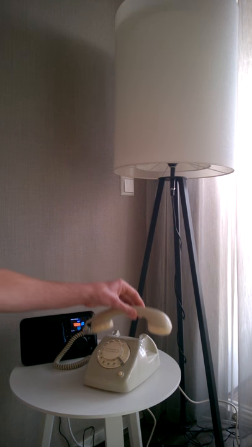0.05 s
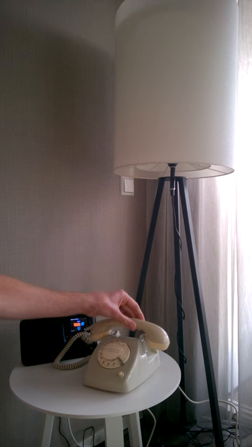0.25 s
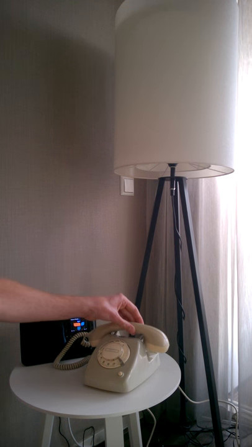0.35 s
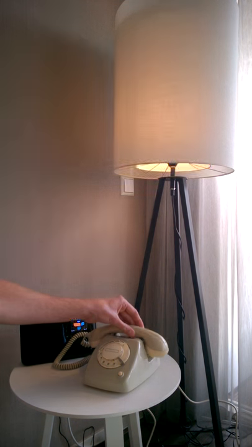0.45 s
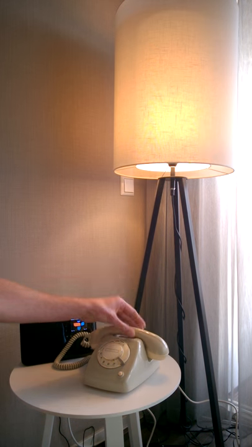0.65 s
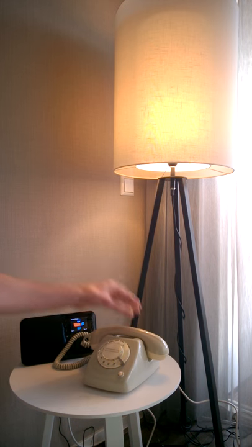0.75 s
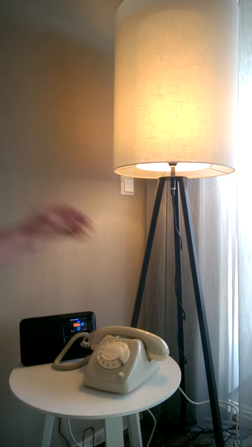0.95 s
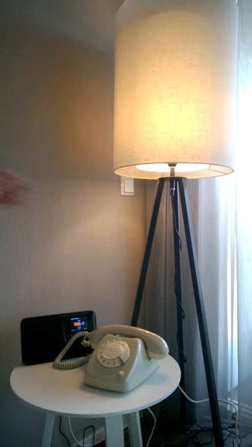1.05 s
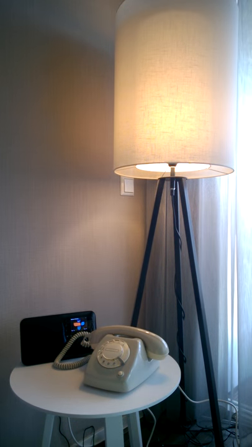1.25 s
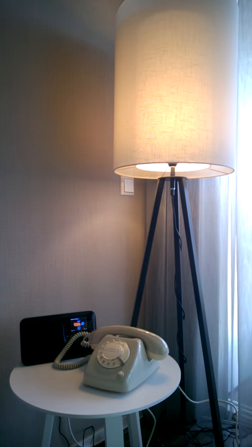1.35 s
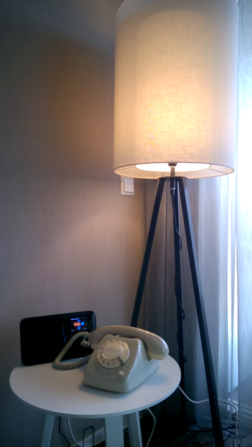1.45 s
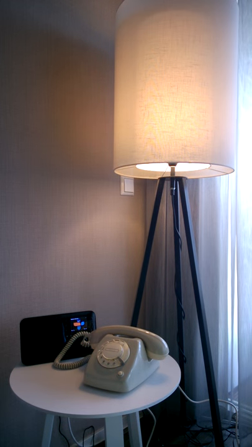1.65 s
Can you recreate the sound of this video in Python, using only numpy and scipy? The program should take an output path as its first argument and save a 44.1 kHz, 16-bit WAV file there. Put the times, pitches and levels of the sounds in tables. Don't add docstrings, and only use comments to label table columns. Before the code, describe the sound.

Old desk phone handset being hung up: hollow knock, sharp metallic hook clack, small rattles, then quiet.

```python
import sys
import numpy as np
from scipy import signal
from scipy.fft import rfft, irfft, next_fast_len
from scipy.io import wavfile
from scipy.ndimage import map_coordinates

SR = 44100
rng = np.random.default_rng(int(sys.argv[2]) if len(sys.argv) > 2 else 0)


def store_pcm(level_fs):
    pcm = np.round(np.clip(level_fs, -1, 1) * 32767).astype(np.int16)
    wavfile.write(sys.argv[1], SR, np.atleast_2d(pcm).T)


def ratio_of_db(decibels):
    return 10 ** (np.asarray(decibels, float) / 20)


N = 74970


def unit(x):
    return x / np.sqrt(np.mean(x ** 2) + 1e-20)


def along(points, hz):
    f, value = np.transpose(points)
    return np.interp(np.log(hz + 1), np.log(f + 1), value)


def wobble(rate):
    knots = rng.standard_normal(int(N * rate / SR) + 4)
    return map_coordinates(knots, [np.arange(N) * rate / SR])


def noise(spectrum, size):
    m = next_fast_len(size + 8192)
    gain = ratio_of_db(along(spectrum, np.fft.rfftfreq(m, 1 / SR)))
    return unit(irfft(rfft(rng.standard_normal(m)) * gain, m)[:size])


def seconds(length_s):
    return np.arange(int(length_s * SR)) / SR


def at(s, sound):
    return np.pad(sound, (round(s * SR), N))[:N]


def decay(t, t60):
    return ratio_of_db(-60 * t / t60)


def rise(t, rise_s):
    return (1 - np.exp(-t / rise_s)) ** 2


FLUTTER_DB, FLUTTER_RATE = 5.5, 54.6


def ring(modes, t, scatter_db, rise_s, free=1, in_step=False):
    hz, db, t60 = np.transpose(modes)[:, :, None]
    luck = rng.standard_normal((len(modes), 2))
    knots = rng.standard_normal((len(modes), 64))
    waver = np.array([np.interp(t * FLUTTER_RATE, np.arange(len(k)), k) for k in knots])
    if in_step:
        waver = 0.76 * waver
        sign = 1
    else:
        sign = np.sign(luck[:, 1:])
    gains = sign * ratio_of_db(db + scatter_db * luck[:, :1] + FLUTTER_DB * waver)
    partials = gains * decay(t, free * t60) * np.sin(2 * np.pi * hz * t)
    return partials.sum(axis=0) * rise(t, rise_s)


# (f/Hz, density/dB)
RUMBLE = [(15, -32), (30, -9), (41, -3.5), (49, 0.5), (55, -2.5), (62, -19), (75, -30), (120, -94)]
# (f/Hz, density/dB)
DRONE = [(60, -24), (78, -11), (100, -0.5), (135, -5.5), (180, -4), (240, -5), (290, -17.5), (380, -40)]
# (f/Hz, density/dB)
HISS = [(200, -39), (300, -6), (1000, -6.5), (2200, -12.5), (4500, -13), (7000, -17.5), (10000, -25),
        (15800, -26)]


def quiet_room():
    t = np.arange(N) / SR
    hum = ratio_of_db(-73.5 + 6 * wobble(7.7)) * np.sin(2 * np.pi * 49.5 * t + 0.4 * wobble(5))
    rumble = ratio_of_db(-57) * noise(RUMBLE, size=N)
    drone = ratio_of_db(-65 + 1.2 * wobble(6.13)) * noise(DRONE, size=N)
    hiss = ratio_of_db(-68 + 0.1 * wobble(9)) * noise(HISS, size=N)
    return hum + rumble + drone + hiss


# (f/Hz, t60/s)
ROOM = [(300, 0.49), (1000, 0.53), (4000, 0.44), (12000, 0.18)]
ROOM_DB, ROOM_DELAY_S = -7.5, 0.006


def room(x):
    hz, t, z = signal.stft(rng.standard_normal(SR // 2), SR, nperseg=256)
    fading = z * decay(t, along(ROOM, hz)[:, None])
    tail = signal.istft(fading, SR, nperseg=256)[1]
    tail = np.pad(tail / np.linalg.norm(tail), (int(ROOM_DELAY_S * SR), 0))
    return signal.fftconvolve(x, tail)


# (t/s, level/dB)
GRIP = [
    (.002, -55),
    (.1, -54),
]
# (f/Hz, level/dB, t60/s)
HELD = [(835, 2, .06), (885, -11, .07), (1029, -1.5, 0.058), (1195, -3.5, 0.044), (1657, -3, 0.037),
        (2270, -7, 0.013), (3720, -5.5, 0.024), (4970, -8, .01)]


def grip():
    t = seconds(0.5)
    dry = sum(at(s, ratio_of_db(db) * ring(HELD, t, 1.8, 0.00013)) for s, db in GRIP)
    return dry + ratio_of_db(ROOM_DB + 3.5) * room(dry)[:N]


# (t/s, level/dB)
JOLTS = [
    (.232, -43),
    (0.526, -49.5),
    (0.629, -54),
]
# (f/Hz, level/dB, t60/s)
TABLE = [(90.6, 1.5, 0.27), (63.7, -14, .12)]


def table():
    t = seconds(0.5)
    return sum(at(s, ratio_of_db(db) * ring(TABLE, t, 1, 0.0062)) for s, db in JOLTS)


# (f/Hz, density/dB)
FIZZ = [(2500, -15), (4500, -3.5), (6000, 2.5), (8000, -5.5), (10500, -14), (12500, -22.5), (15800, -36)]


def chatter(curve):
    s, db = np.transpose(curve)
    level_db = np.interp(np.arange(N) / SR, s, db, left=-150, right=-150)
    lumps = ratio_of_db(3.5 * wobble(600))
    return ratio_of_db(level_db) * unit(lumps * noise(FIZZ, size=N))


# (t/s, level/dB)
SCRAPE = [(.221, -97), (.224, -60), (.233, -62), (.245, -50), (.258, -58), (.268, -84)]
# (t/s, level/dB)
CHATTER = [(0.432, -104), (.437, -34.5), (.46, -39.5), (.50, -50), (0.536, -54), (.547, -52), (.55, -42),
           (.556, -54.5), (.575, -56), (.60, -84)]
# (t/s, level/dB)
TICKS = [
    (1.2907, -59),
    (1.2919, -60),
]
# (f/Hz, level/dB, t60/s)
TICK = [(1630, -1, 0.011), (2010, 0, 0.012), (4300, -1, .008), (6400, -2, .006), (7900, -9, .009),
        (9200, -12, .006)]


def springs():
    t = seconds(0.1)
    ticks = sum(at(s, ratio_of_db(db) * ring(TICK, t, 1.2, 0.0001)) for s, db in TICKS)
    rubbing = chatter(SCRAPE) + chatter(CHATTER)
    return rubbing + ticks + ratio_of_db(ROOM_DB - 3) * room(rubbing + 0.34 * ticks)[:N]


# (t/s, level/dB)
PINGS = [
    (0.4365, -48.5),
    (.5485, -52),
    (.559, -51),
]
# (f/Hz, density/dB)
PING = [(3000, -40), (7000, -3), (10000, 0), (13500, -3), (16000, -5)]


def pings():
    t = seconds(0.1)
    shape = decay(t, 0.053) * rise(t, 0.0004)
    return sum(at(s, ratio_of_db(db) * shape * noise(PING, size=len(t))) for s, db in PINGS)


# (f/Hz, level/dB, t60/s)
CASE = [(195, -39, 0.055), (372.4, -10.5, 0.21), (451.6, -2, 0.32), (470, -10.5, 0.038), (524, -1, 0.2),
        (562, -4, 0.18), (591.3, -10.5, 0.2)]


def case_ring(t, free):
    return ring(CASE, t, 1, 0.0025, free, in_step=True)


# (f/Hz, level/dB, t60/s)
SHELL = [(781, -5, 0.061), (813, -9, 0.071), (996, -3.5, 0.064), (1076.4, -2, 0.1), (1161, -6.5, 0.11),
         (1252, -11, 0.22), (1333, -20.5, 0.11), (1498, -16.5, 0.06), (1600, -14, 0.04), (1693, -3, 0.046),
         (1790, -3, 0.12), (1874, -7.5, 0.08), (2040, -12, 0.031), (2500, -10.5, 0.092)]
# (f/Hz, density/dB)
THUD = [(120, -30), (210, -13.5), (330, -6), (700, -7.5), (1150, -1.5), (1750, -6.5), (2600, -23.5),
        (4500, -20), (9000, -90)]


def shell_knock(t, free):
    thud = ratio_of_db(6.5) * decay(t, 0.069) * rise(t, 0.0012) * noise(THUD, size=len(t))
    return ring(SHELL, t, 2.5, 0.0011, 1.24 * free) + thud


# (f/Hz, level/dB, t60/s)
HOOK = [(2963, -4.5, 0.09), (3240, -8, 0.091), (3661, -8.5, 0.31), (4100, -42, 0.093), (4450, -27, 0.065),
        (4844, -13, 0.06), (5130, -7, 0.06), (5550, -15, .08), (5840, -12, 0.076), (6380, -17, 0.045),
        (7400, -31, 0.043)]
# (f/Hz, density/dB)
CRACK = [(900, -49), (1800, -4), (3000, -4.5), (4200, -5), (6000, -17), (9000, -23.5), (15500, -41)]


def hook_clink(t, free):
    rise_s = 0.0004
    snap_and_buzz = ratio_of_db(4) * decay(t, 0.021) + decay(t, 0.11)
    crack = snap_and_buzz * noise(CRACK, size=len(t)) * rise(t, rise_s)
    return ring(HOOK, t, 2.5, rise_s, free) + crack


# (t/s, case level/dB, shell level/dB, clink level/dB, share of the free ring time)
CONTACTS = [(0.2233, -74, -54, -46, 0.22), (0.2299, -21.5, -34.5, -38, 0.96),
            (.2354, -37.5, -28.5, -34.5, 0.57), (0.244, -27.5, -35, -42, 1.47),
            (.2571, -39.5, -41.5, -44, 1.23), (0.4147, -47, -45.5, -55, 0.16),
            (0.4319, -51, -32.5, -33.5, 0.34), (.4368, -26, -28.5, -29, .45),
            (0.4454, -52, -35, -28.5, 0.39), (0.4522, -66, -35.5, -31.5, .6),
            (0.476, -35.5, -39.5, -37, 0.52), (0.5229, -27, -27, -37.5, 0.44),
            (0.55, -38.5, -39, -41, 0.62), (0.5571, -42.5, -42, -44.5, 0.38),
            (0.5872, -34.5, -43, -50, 0.68), (.604, -31, -42.5, -59, 0.47), (0.6487, -53, -68, -49.5, 0.25),
            (0.6836, -79, -47, -50.5, 0.62), (.698, -72, -63, -63, 0.37), (0.7574, -73, -56, -62, 0.23),
            (0.7882, -34.5, -46, -47, 0.49), (.802, -39, -49.5, -78, 1.03)]


def handset():
    out, t = np.zeros(N + 2 * SR), seconds(0.5)
    for s, case_db, shell_db, clink_db, free in CONTACTS:
        case = ratio_of_db(case_db) * case_ring(t, free)
        shell = ratio_of_db(shell_db - 6) * shell_knock(t, free)
        clink = ratio_of_db(clink_db - 9.5) * hook_clink(t, free)
        wet = ratio_of_db(ROOM_DB) * room(shell + clink + ratio_of_db(-7.5) * case)
        start = round(s * SR)
        out[start:start + len(t)] += case + shell + clink
        out[start:start + len(wet)] += wet
    return out[:N]


def scene():
    return (quiet_room() + grip() + table() + springs() + pings() + handset())[None]


def top_cut(x):
    return signal.sosfilt(signal.butter(12, 16040, fs=SR, output="sos"), x)


def record(dry):
    return top_cut(dry)


dry = scene()
out = record(dry)
store_pcm(out)
```